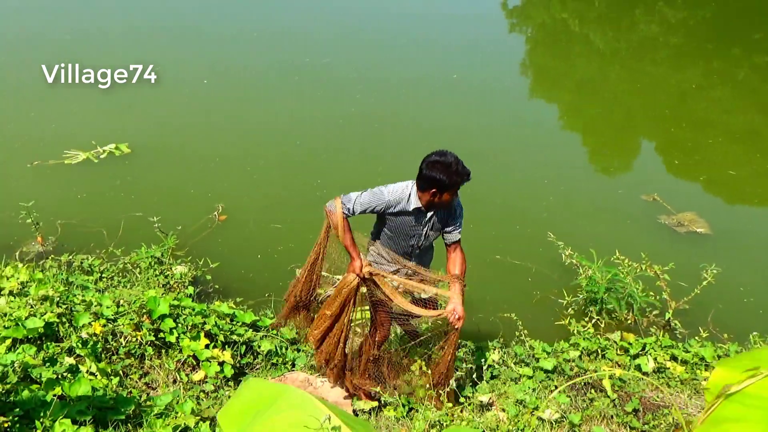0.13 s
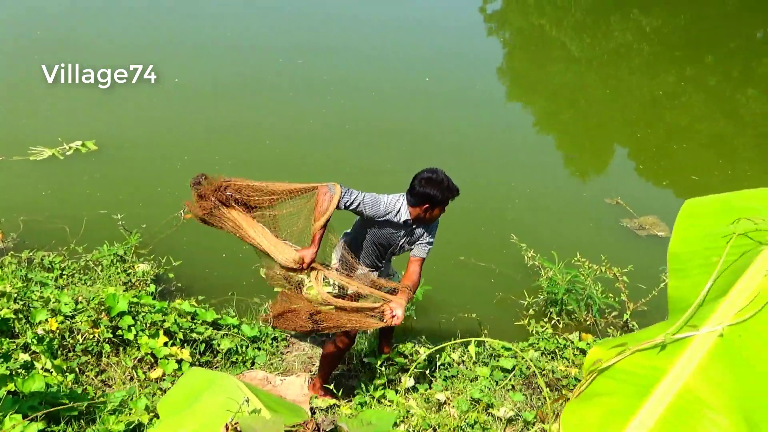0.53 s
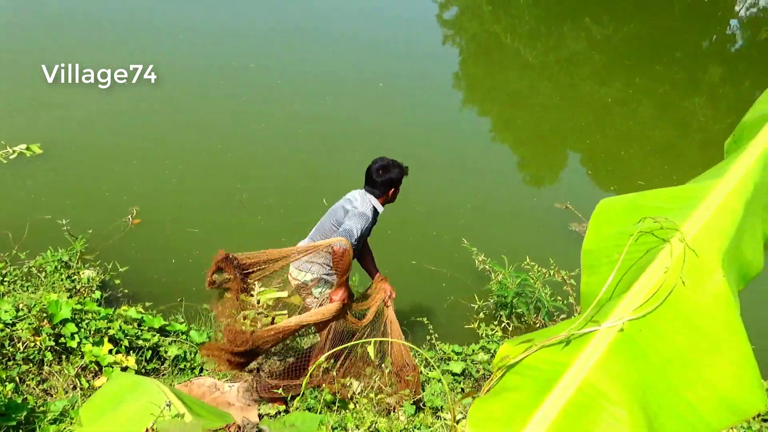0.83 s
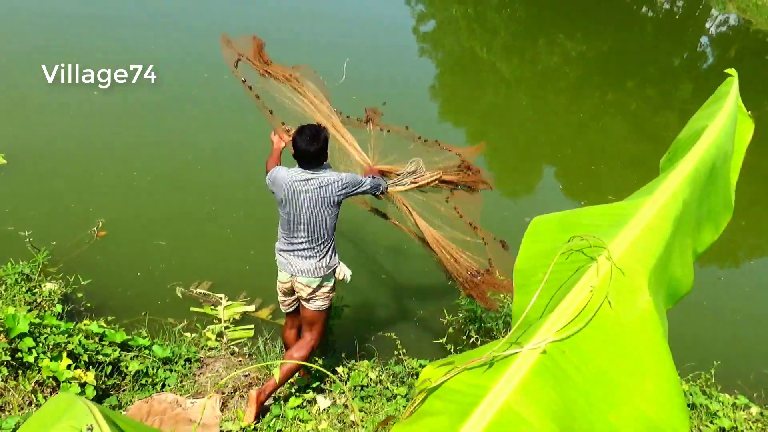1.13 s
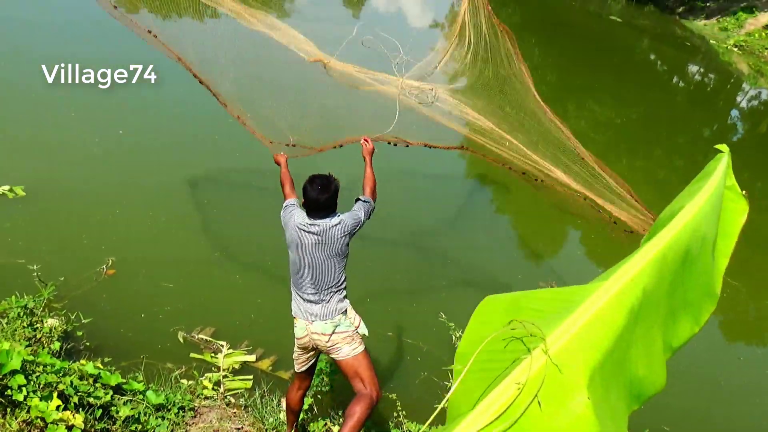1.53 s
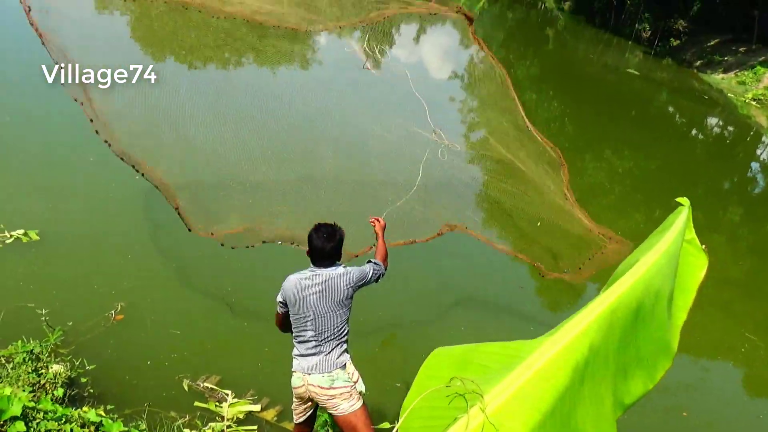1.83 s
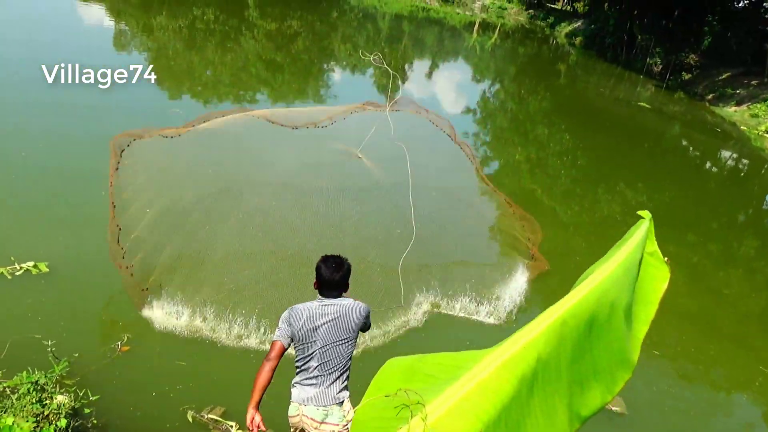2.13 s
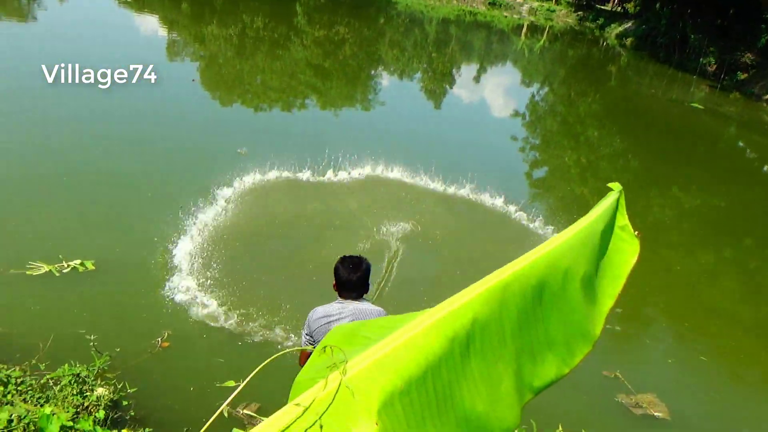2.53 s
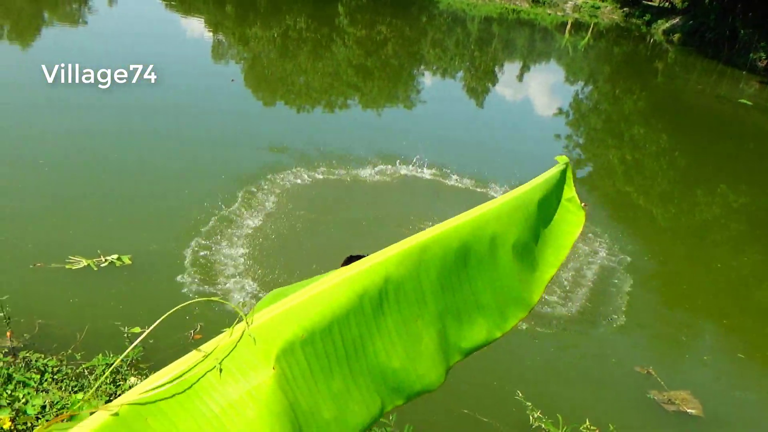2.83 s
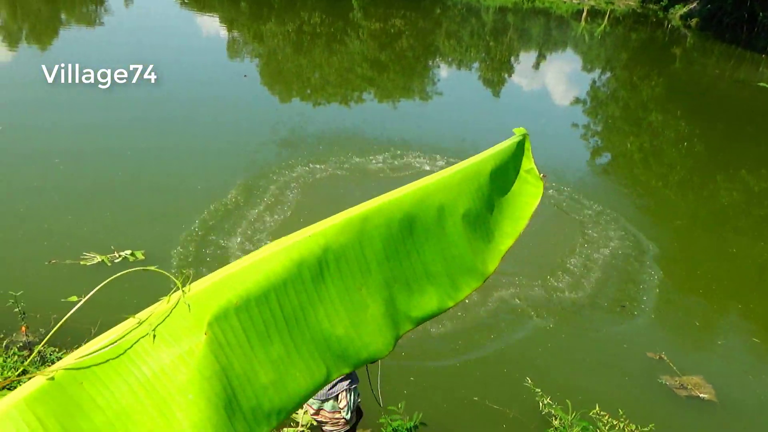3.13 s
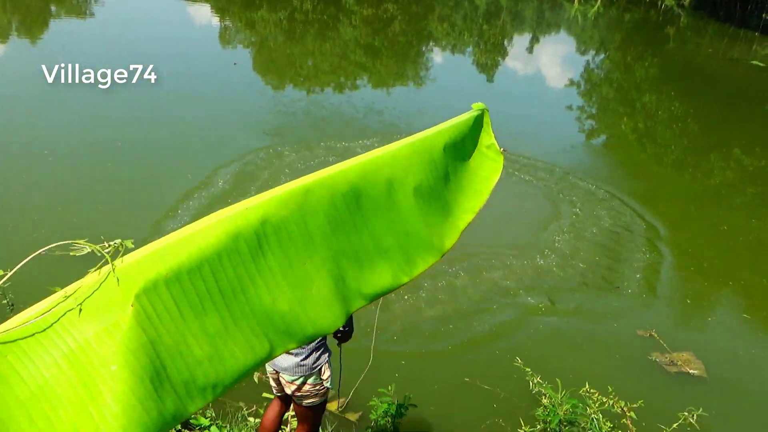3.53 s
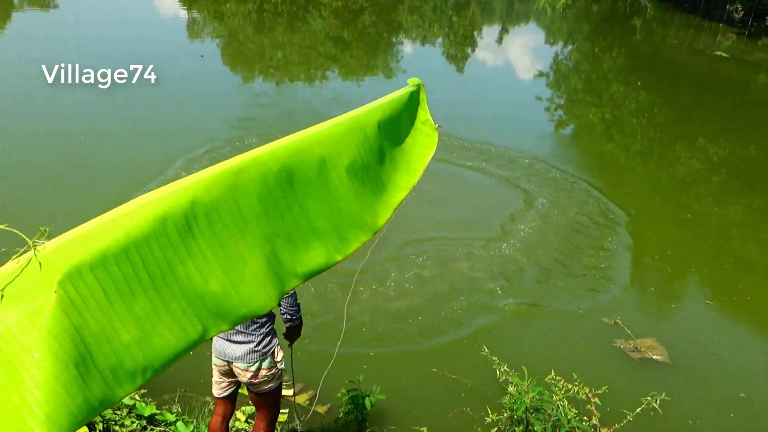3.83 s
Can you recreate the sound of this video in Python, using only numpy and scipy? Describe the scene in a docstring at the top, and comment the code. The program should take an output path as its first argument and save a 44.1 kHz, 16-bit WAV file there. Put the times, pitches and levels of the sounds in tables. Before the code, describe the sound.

Fishing net thrown into a pond: mesh rustle, ticking sinkers, wide bubbly splash, then leaves brushing

```python
"""Throwing a cast net at a pond

A cast net is gathered and swung on a leafy bank: mesh rustles, sinkers tick, feet shift in the weeds.
It swishes through the air and its weighted rim lands in spray and bubbles, near side first, then far side.
Leaves brush close by afterwards; a distant one-cylinder pump engine thuds throughout.
Rustle and water are shaped noise and clouds of tiny notes; ticks, plops, gulps and thuds are placed one by one.
Each sound is built as mid (the centre) and side (the left-right difference), then turned into stereo."""
import sys
import numpy as np
from scipy import signal
from scipy.fft import rfft, irfft, next_fast_len
from scipy.io import wavfile
from scipy.ndimage import uniform_filter1d, map_coordinates

SR = 44100
rng = np.random.default_rng(int(sys.argv[2]) if len(sys.argv) > 2 else 0)


def transcribe(u):
    """Save the signal u as a 16-bit wav file named by the first command-line argument.

    u: samples, shape (n,) or (channels, n), limited to [-1, 1]; the rate is SR.
    q: integer samples, one column per channel.
    """
    v = np.clip(np.atleast_2d(u).T, -1, 1)
    q = np.round(v * 32767).astype(np.int16)
    wavfile.write(sys.argv[1], SR, q)


N = 176400
T = np.arange(N) / SR  # time of every sample, in seconds

# All levels in the tables are relative: later mixing and colouring also change them.
# net and weeds rustling during the swing: start_s, body_level_db, crisp_level_db
SWING_CURVE = [(0, -41, -31.5), (.035, -51.5, -44), (.13, -44.5, -36.5), (.27, -43, -36),
               (.38, -39.5, -33.5), (.56, -43, -37.5), (.66, -45.5, -40), (.73, -38.5, -36.5),
               (.765, -50, -44.5), (.8, -47, -46), (.825, -33, -29.5), (.89, -33.5, -31.5),
               (.935, -39.5, -36), (1.0, -45.5, -30.5), (1.15, -45, -38), (1.25, -44.5, -34),
               (1.38, -46, -40), (1.5, -54.5, -47.5), (1.66, -52, -46)]
# the open net sweeping through the air: start_s, body_level_db, crisp_level_db
FLIGHT_CURVE = [(1.72, -44, -42), (1.782, -47.5, -46), (1.844, -41.5, -38.5), (1.912, -44, -46),
                (2.032, -39, -34.5), (2.09, -42.5, -47)]
# leaves brushing after the throw: start_s, body_level_db, crisp_level_db
LEAVES_CURVE = [(3.1, -44, -36), (3.15, -40, -35.5), (3.225, -47, -38.5), (3.33, -43.5, -37),
                (3.445, -39.5, -36), (3.5, -41, -40), (3.56, -48, -35), (3.67, -39.5, -33.5),
                (3.73, -44.5, -35), (3.79, -42, -35), (3.83, -47, -41.5), (3.875, -41, -36),
                (3.93, -44, -44), (3.955, -49.5, -43), (4, -52, -48)]
# the rim striking the water: start_s, bubbles_level_db, wash_level_db, spray_level_db
SPLASH_CURVE = [(2.1, -46, -44, -35), (2.116, -42, -33.5, -29), (2.155, -38, -33.5, -24),
                (2.195, -16.5, -25, -29), (2.23, -15.5, -21.5, -28), (2.29, -23.5, -25.5, -29.5),
                (2.35, -23.5, -29, -27), (2.425, -23.5, -23.5, -24), (2.455, -20.5, -23.5, -25),
                (2.5, -17.5, -21.5, -22.5), (2.54, -17, -24.5, -25.5), (2.58, -28.5, -24.5, -24),
                (2.65, -30, -29.5, -29), (2.84, -26, -27.5, -30), (2.92, -34, -30, -35),
                (3.0, -28, -30.5, -30), (3.04, -35, -32, -36), (3.1, -36, -38.5, -44),
                (3.25, -51, -72, -59)]
# loudness of the engine: start_s, level_db
ENGINE_CURVE = [(0, -36.5), (.45, -38.5), (.6, -36), (.95, -34.5), (1.08, -42), (1.25, -38), (1.38, -39),
                (1.6, -36.5), (2.1, -36.5), (2.55, -36), (2.7, -31.5), (3.15, -29.5), (3.35, -32),
                (3.65, -30.5), (4, -35.5)]
# ticks of sinkers, twigs and drops: start_s, level_db, pitch_hz, chatter_db (mesh chatter against the crack)
TICK_EVENTS = [(0.051, -19, 7540, -7), (.1518, -12, 8070, -20), (0.19, -8, 8000, -15),
               (.2249, -12, 9300, -15), (.268, -14, 9400, -18), (.3316, -11.5, 9400, -10),
               (0.3968, -7.5, 8950, -13), (.489, -15, 9950, -14), (0.5688, -13, 9790, -14),
               (.7367, -12.5, 9200, -17), (.8106, -18, 8360, -10), (0.858, -10, 8940, -16),
               (0.875, -17, 8940, -9), (.9507, -8, 9000, -10), (0.968, 0.5, 9120, -16),
               (0.984, -6, 9400, -11), (.9917, -5, 8200, -22), (1.009, -16, 7990, -21),
               (1.0266, -11, 8000, -14), (1.0535, -6.5, 9380, -12.5), (1.0868, -8, 8500, -18),
               (1.1035, -8, 9900, -15), (1.224, -5, 8790, -18), (1.239, -10, 8810, -14),
               (1.264, -12, 9320, -23), (1.48, -30, 7400, -20), (1.3115, -25, 6040, -16),
               (1.538, -14.5, 8300, -7), (1.6873, -17.5, 9300, -18), (1.6922, -20.5, 6560, -8.5),
               (2.3293, -6.5, 9600, -7), (2.339, -7, 10500, -8), (2.4236, -8, 8280, -6),
               (2.5013, 0, 8250, -10), (2.531, -4, 7500, -15), (2.583, 1, 7800, -18),
               (2.6625, -6, 9550, -22), (2.719, -7, 8800, -12), (2.774, -4, 8000, -10),
               (2.8122, -8, 8970, -10), (3.15, -6, 8800, -15), (3.4343, -17, 9360, -3.5),
               (3.6972, -7, 8200, -10), (3.7635, -15, 9780, -20), (3.7912, -21, 9090, 1.5),
               (3.863, -20, 6000, -12), (3.8989, -9, 9200, -17), (3.9302, -15.5, 9650, -4)]
# duller snaps and plops of stems, feet and water: start_s, level_db, pitch_hz
PLOP_EVENTS = [(0.23, -21.5, 1510), (0.384, -23, 684), (.4607, -15.5, 1010), (.4865, -19.5, 1310),
               (.526, -26, 3240), (0.592, -24, 3870), (0.637, -23, 3500), (.671, -26.5, 420),
               (.956, -27, 433), (.957, -15.5, 2340), (1.088, -19.5, 3800), (1.307, -22, 1960),
               (1.313, -19.5, 1310), (1.315, -22, 1950), (1.354, -25.5, 1650), (1.6905, -19.5, 3300),
               (3.007, -11, 910), (3.008, -10, 3020), (3.009, -14.5, 525), (3.013, -16, 1700),
               (3.078, -18.5, 1300), (3.389, -27, 800), (3.435, -21, 1970), (3.454, -21, 1360),
               (3.553, -16.5, 1990), (3.684, -21, 1750), (3.808, -22, 2100), (3.879, -26, 780)]
# big bubbles where the cavities under the rim close: start_s, level_db, starting_pitch_hz
GULP_EVENTS = [(2.19, -17, 880), (2.222, -15, 564), (2.238, -20.5, 271), (2.243, -17.5, 206),
               (2.352, -10, 454), (2.419, -19, 241), (2.477, -9, 404), (2.492, 0, 810), (2.516, -4, 865),
               (2.53, -12.5, 443), (2.668, -27.5, 254), (2.78, -11, 746), (2.805, -15, 890),
               (2.848, -10, 1390), (2.856, -28, 620)]
# notes of the exhaust: pitch_hz, level_db, fade_by_60_db_s
EXHAUST_NOTES = [(97.6, 5, 0.068), (143, -0.5, 0.066), (198, -13, 0.23)]
# tone of the blurred engine drone: frequency_hz, level_db
DRONE_TONE = [(20, -42), (40, -7), (70, -11.5), (100, 1), (130, -1.5), (180, 0.5), (240, -10), (330, -14.5),
              (600, -14), (1500, -90)]
# tone of the still outdoor air: frequency_hz, level_db
AIR_TONE = [(100, -40), (300, -17.5), (700, 0), (1500, -0.5), (4000, -5.5), (6500, -23), (9300, -28),
            (12000, -22), (16000, -34)]
# tone of the papery part of a rustle: frequency_hz, level_db
RUSTLE_BODY_TONE = [(100, -11), (300, -3), (600, -2), (1200, 0.5), (2000, -1), (3500, -2), (5500, -8),
                    (8000, -22), (14000, -50)]
# tone of the crisp top of a rustle: frequency_hz, level_db
RUSTLE_CRISP_TONE = [(1500, -55), (4000, -10), (6000, -4), (8000, 1), (9500, 2), (11000, -5),
                     (13000, -10.5), (16000, -20)]
# tone of the churning water: frequency_hz, level_db
WASH_TONE = [(100, -20), (220, -6), (500, -2.5), (1400, 2), (2000, -0.5), (3000, -1), (5000, -7.5),
             (8000, -10.5), (14000, -42)]
# tone of the fine spray: frequency_hz, level_db
SPRAY_TONE = [(1500, -37), (4000, -3), (6000, 0), (8000, 4.5), (9600, 7), (11000, 1.5), (13000, -6),
              (16000, -17)]
# tone of the mesh chatter around a tick: frequency_hz, level_db
CHATTER_TONE = [(500, -30), (2500, -13), (5000, -3.5), (8000, 1), (9600, 3), (11500, -4.5), (16000, -24)]
# stereo width, as a gain on the side signal: frequency_hz, side_gain_db
STEREO_WIDTH = [(50, -52), (250, -8), (1000, -12.5), (4000, -15.5), (8000, -10.5), (12000, -34.5)]

# the engine fires this often on average, and each thud returns off the bank
FIRST_FIRING_S, FIRING_PERIOD_S = .054, .1283
BANK_ECHO_S, BANK_ECHO_DB = 0.01124, 4.5
AIR_DB = -49
SPLASH_SIDE_DB, AIR_SIDE_DB = -2, 8  # side level: the splash a little narrower, the air wider
BUBBLE_DB, WASH_DB, PLINK_DB, SPRAY_DB = -3, -0.5, -8, 3.5  # balance of the splash
FROTH_DB, FROTH_PER_S = 0.6, 80  # quick swings in the level of wash and spray
TOP_HZ = 15900  # nothing is kept above this


def amp(db):
    """Turn decibels into a gain."""
    return 10 ** (np.asarray(db) / 20)


def unit(x):
    """Scale to an average (rms) strength of 1."""
    return x / np.sqrt(np.mean(x ** 2) + 1e-20)


def place(x, side):
    """Make mid and side from x, with the given gain on the side."""
    return x * np.array([[1], [side]])


def fade_60(age):
    """Natural dying away: 60 dB quieter when age reaches 1."""
    return np.exp(-np.log(1000) * age)


def gains(rows, fade_s=.03):
    """A smooth gain for each level column, fading out beyond the first and last times."""
    times, *columns = np.transpose(rows)
    gate = np.clip(1 + np.minimum(T - times[0], times[-1] - T) / fade_s, 0, 1)
    return [gate * amp(np.interp(T, times, column)) for column in columns]


def wobble(rate):
    """A smooth random curve through this many random values a second."""
    return map_coordinates(rng.standard_normal(4000), [T * rate], mode="wrap")


def filtered(x, response):
    """Multiply each frequency in x by its response."""
    m = next_fast_len(N + SR // 2)  # spare room at the end
    return irfft(rfft(x, m) * response(np.fft.rfftfreq(m, 1 / SR)), m)[..., :N]


def colour(x, tone):
    """Give x the tone of a frequency and level table."""
    f, db = np.transpose(tone)
    return filtered(x, lambda hz: amp(np.interp(np.log(hz + 1), np.log(f), db)))


def add(out, s, x):
    """Mix x into out at time s."""
    i = max(0, round(s * SR))
    out[..., i:i + x.shape[-1]] += x[..., :N - i]


def patches(x, patchy_db):
    """Brief random resonances: each moment favours its own frequencies."""
    z = signal.stft(x, nperseg=512)[2]
    field = rng.standard_normal(z.shape[1:])
    field = uniform_filter1d(uniform_filter1d(field, 5, 0), 3, 1)  # blur over frequency, then time
    return unit(signal.istft(z * amp(patchy_db * unit(field)), nperseg=512)[1][:, :N])


def crackle(tone, rate, spread_db, hiss_db):
    """Tiny impacts of uneven size, about rate of them a second, over a smooth hiss."""
    hit = rng.random(N) < rate / SR
    size = amp(spread_db * np.minimum(rng.exponential(size=N), 3.5))
    grains = unit(hit * size * np.sign(rng.standard_normal((2, N))))
    hiss = amp(hiss_db) * rng.standard_normal((2, N))
    return unit(colour(patches(grains + hiss, patchy_db=2.0), tone))


def pings(rows, count, centre_hz, octaves, cycles, rise, spread_db):
    """A cloud of brief damped notes, bubbles or snapping fibres, over the time span of a curve."""
    chance, normal = rng.random((count, 3)), rng.standard_normal((count, 3))
    t = np.arange(SR // 25) / SR
    start, span = rows[0][0], rows[-1][0] - rows[0][0]
    hz = np.clip(centre_hz * 2 ** (octaves * normal[:, :1]), 150, SR / 4)
    age = t * hz / (cycles * np.exp(0.51 * normal[:, 1:2]))
    # the pitch climbs by the fraction rise while the note dies away
    ring = np.sin(2 * np.pi * hz * t * (1 + rise * np.minimum(age, 1) / 2))
    ring *= fade_60(age) * (1 - np.exp(-hz * t))
    ring *= amp(spread_db * chance[:, 1:2]) * np.sign(chance[:, 2:] - .5) * np.sqrt(hz / centre_hz)
    # one note in each equal slice of the span, at a random place inside it
    begin = start + span * (np.arange(count)[:, None] + chance[:, :1]) / count
    at = np.abs((begin + t) * SR).astype(int).ravel()
    pans = (1, 1.85 * np.tanh(normal[:, 2:]))  # mid, side
    cloud = np.array([np.bincount(at, (ring * pan).ravel(), N)[:N] for pan in pans])
    return unit(cloud) * np.sqrt(span * SR / N)


def outdoor_air():
    """Still outdoor air: a steady, wide, soft noise."""
    air = amp(AIR_DB) * unit(colour(rng.standard_normal((2, N)), AIR_TONE))
    return place(air, amp(AIR_SIDE_DB))


def engine(drone_db=-10, follows=0.51, jitter_s=0.0028, rise_s=0.0044):
    """Each firing rings the exhaust and returns off the bank; scattered echoes blur into a drone."""
    level, = gains(ENGINE_CURVE)
    thuds, t = np.zeros(N), np.arange(SR // 6) / SR
    for s in np.arange(FIRST_FIRING_S, N / SR - .02, FIRING_PERIOD_S):
        thud = np.zeros(len(t))
        for hz, db, t60 in EXHAUST_NOTES:
            strength = amp(db + rng.normal(0, 2.5))  # no two firings are alike
            thud -= strength * np.sin(2 * np.pi * hz * t) * fade_60(t / t60)
        thud *= 1 - np.exp(-t / rise_s)
        s += jitter_s * rng.normal()
        add(thuds, s, thud)
        add(thuds, s + BANK_ECHO_S, amp(BANK_ECHO_DB) * thud)
    thuds = signal.sosfilt(signal.butter(2, 50, "high", fs=SR, output="sos"), thuds)
    # the drone follows the loudness of the engine only partly
    drone_level = level.mean() * (level / level.mean()) ** follows
    drone = unit(colour(rng.standard_normal((2, N)), DRONE_TONE)) * drone_level
    return place(level * thuds, 0) + amp(drone_db) * drone


def rustle(rows, body_db, crisp_db, rate, spread_db, flutter_db):
    """Mesh and leaves slipping in small jerks: a papery body and a crisp top."""
    body, crisp = gains(rows)
    jerks = amp(flutter_db * wobble(70))
    low = amp(body_db + 0.4 * wobble(45)) * body * crackle(RUSTLE_BODY_TONE, rate, spread_db, hiss_db=-1)
    high = amp(crisp_db) * crisp * crackle(RUSTLE_CRISP_TONE, rate, spread_db, hiss_db=-2)
    return jerks * (low + high)


def stems(rows, count, level_db):
    """Small pitched snaps of stems and fibres that follow the level of a rustle."""
    body, _ = gains(rows)
    snaps = pings(rows, count, centre_hz=2910, octaves=0.554, cycles=14.6, rise=0, spread_db=1)
    return amp(level_db) * body * snaps


def ticks(peak_s=0.00085, crack_s=0.00015, lead_s=0.0055, swell_s=0.0014, chatter_s=0.0033):
    """Each tick is a crack of a few cycles inside a short chatter of mesh."""
    cracks, chatter, t = np.zeros((2, N)), np.zeros((2, N)), np.arange(SR // 25) / SR
    u = t - peak_s
    # the chatter swells for lead_s, then dies away
    swell = np.exp(np.minimum((t - lead_s) / swell_s, (lead_s - t) / chatter_s))
    for s, db, hz, chatter_db in TICK_EVENTS:
        crack = np.exp(-np.abs(u) / crack_s) * np.sin(2 * np.pi * hz * u + 2 * np.pi * rng.random())
        add(cracks, s, amp(db) * place(crack, rng.uniform(-1, 1)))
        noise = rng.standard_normal((2, len(t)))
        # started early, so that it peaks together with the crack
        add(chatter, s + peak_s - lead_s, amp(db + chatter_db) * swell * noise)
    return cracks + colour(chatter, CHATTER_TONE)


def plops(cycles=10, rise_cycles=0.42, scuff_db=-8, scuff_s=0.0038):
    """A quickly damped note with a scuff of noise around its pitch."""
    out, t = np.zeros((2, N)), np.arange(SR // 25) / SR
    for s, db, hz in PLOP_EVENTS:
        note = np.sin(2 * np.pi * hz * t) * fade_60(t * hz / cycles)
        band = signal.butter(2, [hz * 0.59, min(hz * 1.46, SR / 3)], "band", fs=SR)
        scuff = unit(signal.lfilter(*band, rng.standard_normal((2, len(t))))) * np.exp(-t / scuff_s)
        rise = 1 - np.exp(-t * hz / rise_cycles)
        add(out, s, amp(db) * rise * (place(note, rng.uniform(-1, 1)) + amp(scuff_db) * scuff))
    return out


def splash():
    """Sinkers pierce the surface: spray at once, then the gurgle of closing cavities and falling drops."""
    gurgle, wash, spray = gains(SPLASH_CURVE, fade_s=0.0046)
    bubbles = pings(SPLASH_CURVE, count=1000, centre_hz=814, octaves=0.434, cycles=17.3, rise=0.11,
                    spread_db=8.5)
    plinks = pings(SPLASH_CURVE, count=550, centre_hz=1897, octaves=0.558, cycles=24, rise=0.32,
                   spread_db=9)
    churn = crackle(WASH_TONE, rate=2100, spread_db=3.0, hiss_db=1.5)
    water = wash * (amp(WASH_DB) * churn + amp(PLINK_DB) * plinks)
    drops = amp(SPRAY_DB) * spray * crackle(SPRAY_TONE, rate=3000, spread_db=4, hiss_db=1)
    froth = amp(FROTH_DB * wobble(FROTH_PER_S))
    return amp(BUBBLE_DB) * gurgle * bubbles + froth * (water + drops)


def gulps(cycles=22, rise_per_s=3.2, swell_s=0.004):
    """Each big bubble swells into a short note of rising pitch."""
    out, t = np.zeros((2, N)), np.arange(SR // 8) / SR
    for s, db, hz in GULP_EVENTS:
        note = np.sin(2 * np.pi * hz * t * (1 + rise_per_s * t / 2))
        note *= fade_60(t * hz / cycles) * (1 - np.exp(-t / swell_s))
        add(out, s, amp(db) * place(note, rng.uniform(-1.1, 1)))
    return out


def scene():
    """All sources over still outdoor air, in a narrow stereo image."""
    swing = rustle(SWING_CURVE, body_db=0, crisp_db=1, rate=1300, spread_db=1, flutter_db=2.5)
    flight = rustle(FLIGHT_CURVE, body_db=-0.5, crisp_db=-0.5, rate=5000, spread_db=4.5, flutter_db=1.5)
    leaves = rustle(LEAVES_CURVE, body_db=4.0, crisp_db=1.5, rate=1800, spread_db=2.5, flutter_db=0.57)
    weeds = stems(SWING_CURVE, count=130, level_db=-7.5) + stems(LEAVES_CURVE, count=160, level_db=-5)
    water = place(splash() + gulps(), amp(SPLASH_SIDE_DB))
    net_and_leaves = swing + flight + leaves + weeds
    mid, side = outdoor_air() + engine() + net_and_leaves + ticks() + plops() + water
    side = colour(side, STEREO_WIDTH)
    return np.array([mid + side, mid - side]) * amp([[.25], [-.25]])  # left slightly louder, in dB


def record(dry):
    """Cut everything above the band limit and round off the highest peaks."""
    x = filtered(dry, lambda hz: hz < TOP_HZ)
    rounded = x / (1 + np.abs(x / .92) ** 8) ** (1 / 8)
    return filtered(rounded, lambda hz: hz < TOP_HZ)


dry = scene()
out = record(dry)
transcribe(out)
```